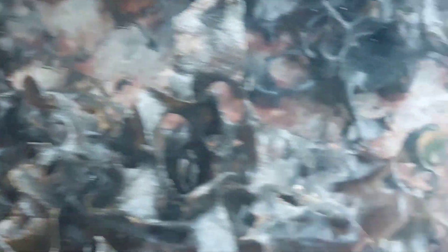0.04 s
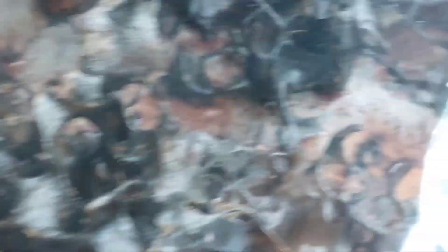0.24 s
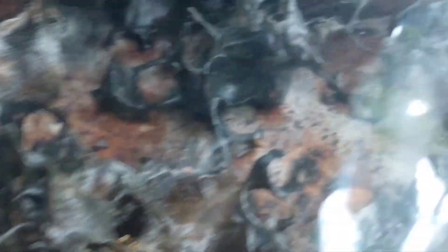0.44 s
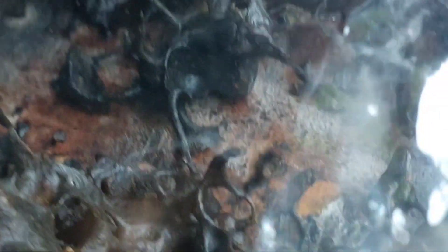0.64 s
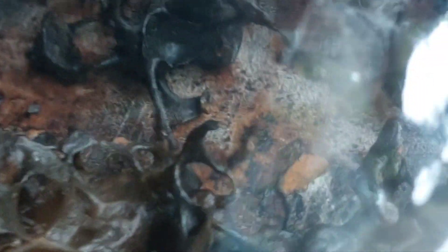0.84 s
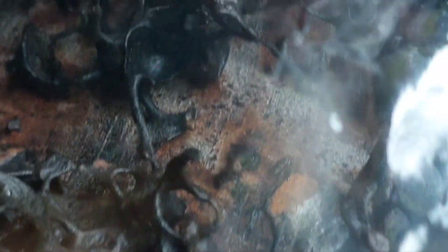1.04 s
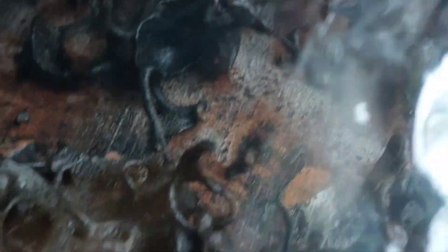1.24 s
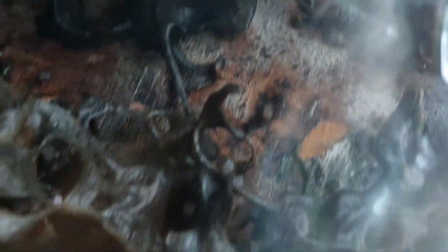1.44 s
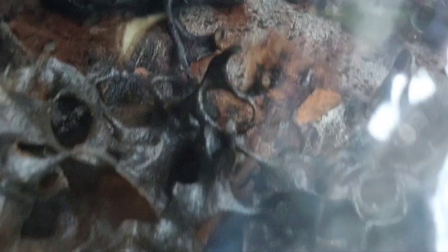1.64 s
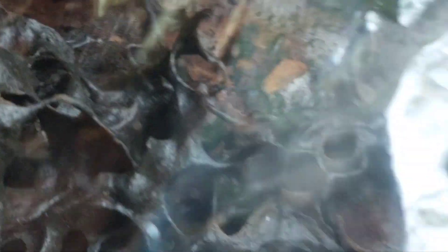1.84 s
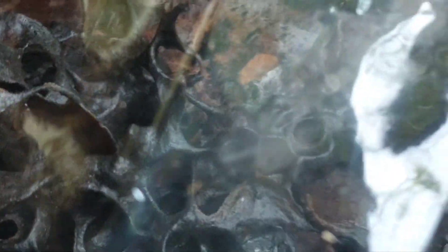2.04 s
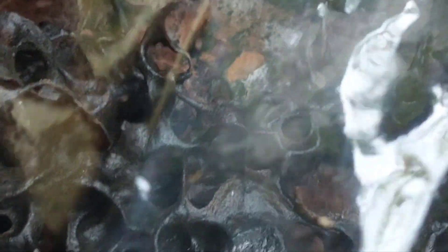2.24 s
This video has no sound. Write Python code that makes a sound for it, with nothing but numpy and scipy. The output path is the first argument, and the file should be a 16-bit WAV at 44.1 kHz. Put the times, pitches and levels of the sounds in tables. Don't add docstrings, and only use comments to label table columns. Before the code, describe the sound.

Close stereo foil crinkling outdoors, faint individual snaps at first, swelling to a short bright crackling rush at mid-length, ending in a dull knock, a few snaps and very faint high sliding squeaks over low hollow hum.

```python
import sys
import numpy as np
from scipy import signal
from scipy.fft import rfft, irfft
from scipy.io import wavfile
from scipy.ndimage import uniform_filter1d

SR = 44100
rng = np.random.default_rng(int(sys.argv[2]) if len(sys.argv) > 2 else 0)


def decibels_to_gain(level_db):
    exponent = np.asarray(level_db, float) / 20
    return 10 ** exponent


def store_wav(level_fs):
    pcm = np.round(np.clip(np.atleast_2d(level_fs), -1, 1) * 32767)
    wavfile.write(sys.argv[1], SR, pcm.T.astype(np.int16))


N = 101429

# (time [s], level [dB])
HANDLING = [(0, -74), (.46, -71), (.48, -64.5), (.6, -56), (0.718, -66), (.79, -57.5), (0.809, -59.5),
            (.92, -56), (1.04, -68.5), (1.13, -56.5), (1.21, -72), (1.222, -54), (1.33, -39.5),
            (1.478, -34), (1.66, -41), (1.685, -49), (1.779, -63), (2.3, -60)]
# (time [s], length [s], change [dB])
LULLS = [
    (1.319, 0.03, -3.5),
    (1.42, .01, -3.5),
    (1.466, 0.0061, 2),
    (1.53, 0.018, -0.5),
    (1.541, 0.012, -2),
    (0.588, 0.011, -3.5),
    (0.715, 0.023, -1),
    (0.937, 0.012, -8),
]
# (time [s], right side hears later by [samples], left over right [dB])
PLACE = [
    (0, 34, -10),
    (.7, 20.7, -1.5),
    (1.403, 19, -1),
    (1.449, 5.5, -0.5),
    (2.3, 5.4, -6.5),
]
# (frequency [Hz], level [dB per Hz])
FOIL = [(350, -7), (600, -13.5), (1100, -1), (1540, -1), (1950, -4), (3230, -3), (15800, -9.5)]
# (frequency [Hz], width [Hz], change [dB])
SHEET_HUMPS = [(1130, 400, 3), (1950, 300, 3), (2350, 450, 5), (1500, 250, -6), (4660, 500, 2),
               (8800, 1200, -4)]
# (time [s], peak [dB], brightness [dB per octave])
SNAPS = [(0.0593, -46, 2.5), (0.099, -47, -4), (0.1263, -46.5, 3), (0.134, -54, 0), (0.1793, -44, -8),
         (0.2445, -41.5, -5), (0.358, -44, 16), (0.3671, -38.5, -2.5), (0.5518, -40.5, 2),
         (0.5807, -43, -1), (0.606, -46.5, -6), (0.6534, -50, -2), (0.6782, -44, 1),
         (0.7038, -36.5, 3.5), (0.747, -35, 7.5), (0.7663, -42.5, -2), (0.803, -53, -14),
         (0.8247, -39.5, -1), (0.845, -38.5, 0.5), (0.861, -42, 7), (0.8737, -40, -1),
         (0.891, -36, -6), (0.916, -41.5, -1), (0.923, -48, 3), (0.969, -44.5, 1), (0.992, -41, 6),
         (1.059, -43, 7), (1.0791, -26.5, 4.5), (1.0946, -41, 5),
         (1.1212, -41.5, -4), (1.1346, -39, 4), (1.1472, -42, -7), (1.221, -33.5, 1.5),
              (1.266, -20, 6.5), (1.287, -23.5, 0), (1.554, -25, 8.5), (1.5737, -22, 3.5),
              (1.6012, -18.5, 7), (1.614, -45, 4), (1.67, -31, -0.5), (1.6875, -38, -1), (1.712, -33, 1),
              (1.7293, -40, 0), (1.7716, -40, 1), (1.7993, -40, 0), (1.813, -46, -3), (1.867, -42.5, 1),
              (1.877, -31, 8), (1.9148, -39.5, -2), (2.0228, -30, -2), (2.0565, -41, 0), (2.0882, -38, -5),
              (2.1568, -41.5, -2), (2.193, -38.5, -1), (2.2193, -32.5, 3), (2.2783, -29, 5),
         (1.2946, -26, 10), (1.319, -28.5, 4), (1.364, -27, 3), (1.379, -32, 6), (1.392, -26, 14),
              (1.402, -36, 5), (1.41, -38, 8), (1.59, -26, 3), (1.615, -21, -1), (1.634, -39, 12),
              (1.644, -54, -7), (1.745, -54, 2), (1.763, -48.5, -2), (1.781, -39, -11), (1.806, -43.5, 4),
              (0.641, -55, 2), (0.659, -46, 0), (0.831, -42, 0), (0.902, -45, -5), (0.952, -54, -6),
              (2.11, -53.5, 6), (2.176, -46, 4)]
# (time [s], peak [dB], brightness [dB per octave], length [s])
RUNS = [(0.474, -42, 0, 0.01), (0.496, -44.5, 2.5, 0.011), (0.525, -47.5, -1.5, 0.0082),
        (0.806, -44.5, 3, 0.015), (0.964, -46.5, 1, 0.006), (1.425, -32, 8, 0.0041),
        (1.43, -28.5, 2, 0.014), (1.456, -16.5, 2, 0.006), (1.464, -18.5, -1, 0.0023),
        (1.48, -21.5, -1.5, 0.01), (1.491, -18.5, 4, 0.0022), (1.5, -26, 1, 0.008),
        (1.531, -16.5, 4.5, 0.0015), (1.569, -26.5, 0, 0.0017), (1.601, -31, -8, 0.01)]
# (time [s], peak [dB], pitch [Hz], time to fall 60 dB [s])
POPS = [
    (0.478, -50, 2200, .025),
    (0.77, -51, 2200, .035),
    (0.892, -49, 2300, .035),
    (1.458, -27, 1100, .025),
    (1.505, -28, 1900, .055),
    (1.609, -30, 1650, .03),
    (1.7, -39, 1950, .014),
    (2.086, -45, 1600, .03),
]
# (time [s], pitch [Hz], level [dB])
SQUEAK_RISING = [(1.915, 12500, -68), (1.93, 13300, -62), (1.985, 14600, -57), (2.0, 15200, -66),
                 (2.02, 15600, -64), (2.04, 14800, -61), (2.08, 13750, -58), (2.11, 14200, -60),
                 (2.13, 14900, -63)]
SQUEAK_LONG = [(1.985, 12300, -65), (2.018, 13000, -59), (2.065, 12100, -65), (2.105, 12800, -57),
               (2.135, 13600, -61), (2.175, 13400, -60), (2.198, 12800, -60), (2.252, 13000, -60),
               (2.285, 12200, -62)]
SQUEAK_FALLING = [(2.185, 14700, -67), (2.2, 14400, -63), (2.25, 14500, -62), (2.275, 13800, -62),
                  (2.3, 13100, -64)]
SQUEAK_LOW = [(2.0, 9100, -78), (2.1, 9600, -77), (2.14, 10200, -72), (2.19, 9700, -73)]
SQUEAK_FIRST = [(1.895, 13400, -73), (1.92, 14400, -68), (1.95, 14950, -71)]
# (time [s], pitch [Hz], level [dB])
RUB = [(1.9, 2560, -68), (1.94, 2700, -65), (1.985, 2640, -62), (2.01, 2520, -67), (2.045, 2580, -62),
       (2.07, 2380, -66), (2.15, 2520, -65), (2.21, 2680, -66)]
RUB_HIGH = [(1.95, 5100, -73), (2.0, 5400, -69), (2.07, 5300, -72), (2.14, 5550, -69), (2.2, 5400, -70),
            (2.27, 5350, -73)]
RUB_HAZE = [(1.84, 2750, -64.5), (2.05, 2610, -58.5), (2.3, 2450, -69)]
# (time [s], pitch [Hz], level [dB])
SCRAPE = [
    (.14, 1770, -68),
    (.2, 1610, -62),
    (.28, 1630, -65.5),
]
# (time [s], level [dB])
WHINE = [(0, -87), (.33, -72), (0.399, -92.5), (1.2, -90)]
# (frequency [Hz], width [Hz], level [dB])
HOLLOW = [(105, 32, -9.5), (150.9, 13.6, -4.5), (255.7, 30, -5), (306.8, 23.8, -1.5), (404.4, 99, -11),
          (461, 135, -16)]
# (frequency [Hz], level [dB per Hz])
AIR = [(45, 4), (125, 3), (210, -10.5), (520, -20), (850, -24.5), (2300, -27.5), (8500, -40), (16000, -45)]
# (frequency [Hz], likeness [0 to 1])
AIR_SAME = [(60, 0.69), (240, 0.83), (950, 0.16), (3770, 0.06), (15000, 0.02)]
# (frequency [Hz], left over right [dB])
AIR_PAN = [(40, -0.5), (150, 2.5), (500, -2.5), (1200, -6.5), (8000, -4)]
# (time [s], level [dB])
GUSTS = [
    (0, -3.5),
    (.5, 4),
    (.85, -2.5),
    (1.4, 0.5),
    (1.6, -2.5),
    (1.8, -0.5),
    (2.3, -4),
]

THUMP_S = 1.608
RUB_WIDTH_HZ = 680


def evened(x):
    return x / np.sqrt(np.mean(x ** 2) + 1e-20)


def drift(x, first, second):
    return evened(uniform_filter1d(uniform_filter1d(x, size=first), size=second))


def read(points, hz):
    f, value = np.transpose(points)
    return np.interp(np.log(hz + 1), np.log(f + 1), value)


def coloured(x, db_of):
    size = x.shape[-1]
    gain = decibels_to_gain(db_of(np.fft.rfftfreq(size, 1 / SR)))
    return irfft(rfft(x) * gain, size)


def resonate(x, hz, width_hz):
    turn = np.exp(2j * np.pi * np.cumsum(hz * np.ones(len(x))) / SR)
    r = np.exp(-np.pi * width_hz / SR)
    return 2 * (turn * signal.lfilter([1 - r], [1, -r], x / turn)).real


def heard(near, other):
    share, at = 0.3, np.arange(N)
    s, lag, pan_db = np.transpose(PLACE)
    lag = np.interp(at / SR, s, lag).round().astype(int)
    pan_db = np.interp(at / SR, s, pan_db)
    far = share * near + np.sqrt(1 - share ** 2) * other
    right = far[np.maximum(at - lag, 0)]
    return np.array([near * decibels_to_gain(pan_db / 2), right * decibels_to_gain(-pan_db / 2)])


def handling_db():
    t = np.arange(N) / SR
    effort = np.interp(t, *np.transpose(HANDLING))
    for s, length, db in LULLS:
        effort += db * np.exp(-(2 * (t - s) / length) ** 4)
    return effort


def humps_db(hz):
    return sum(db * np.exp(-2 * ((hz - f) / w) ** 2) for f, w, db in SHEET_HUMPS)


def foil_db(hz):
    return read(FOIL, hz) + humps_db(hz) - 24 * np.maximum(np.log2(550 / (hz + 1)), 0)


def creases():
    light_per_s, rush_per_s = 600, 3500
    spread_db, clump_db = 3.6, 1
    rise_s, t60_s = 0.001, 0.006
    effort = handling_db()
    work = (effort - effort.min()) / (effort.max() - effort.min())
    rate = light_per_s * (rush_per_s / light_per_s) ** work
    clumps = drift(rng.standard_normal(N), 500, 300)
    size = decibels_to_gain(spread_db * np.minimum(rng.exponential(1, N), 4) + clump_db * clumps)
    size *= (rng.random(N) < rate / SR) / np.sqrt(rate)
    kinds = 24
    kind = rng.integers(0, kinds, N)
    t = np.arange(1500) / SR
    shape = np.minimum(t / rise_s, 1) ** 2 * decibels_to_gain(-60 * t / t60_s)
    out = np.zeros((2, N))
    for k in range(kinds):
        tick = rng.standard_normal((2, len(t))) * shape
        out += signal.oaconvolve((size * (kind == k))[None], tick, axes=1)[:, :N]
    near, other = evened(coloured(out, foil_db)) * decibels_to_gain(effort)
    return heard(near, other)


def snap_colour(tilt_db):
    lumps_db = 3.5 * rng.standard_normal(16)

    def colour(hz):
        bright = tilt_db * np.log2(np.clip(hz, 1800, 11500) / 5000)
        low_cut = 7 * np.maximum(np.log2(2600 / (hz + 1)), 0)
        lumps = np.interp(np.sqrt(hz / hz[-1]), np.linspace(0, 1, 16), lumps_db)
        return foil_db(hz) + bright - low_cut + lumps

    return colour


def snaps():
    rise_s, hold_s, t60_s = 0.00054, 0.0024, 0.016
    tail_db, tail_t60_s, trim_db = -20, 0.05, -9
    events = [(*row, hold_s) for row in SNAPS] + RUNS
    out, on = np.zeros((2, N + 4096)), np.arange(4096) / SR
    for s, db, tilt_db, hold in events:
        after = np.maximum(on - hold, 0)
        fall = decibels_to_gain(-60 * after / t60_s) + decibels_to_gain(tail_db - 60 * after / tail_t60_s)
        shape = np.minimum(on / rise_s, 1) ** 2 * fall
        noise = coloured(rng.standard_normal((2, len(on))), snap_colour(tilt_db))
        at = round(s * SR)
        out[:, at:at + len(on)] += evened(noise) * shape * decibels_to_gain(db + trim_db)
    return heard(*out[:, :N])


def pops():
    rise_s = 0.00067
    out, on = np.zeros((2, N + 4096)), np.arange(4096) / SR
    for s, db, hz, t60 in POPS:
        phase = 2 * np.pi * rng.random((2, 1))
        shape = np.minimum(on / rise_s, 1) * decibels_to_gain(db - 60 * on / t60)
        at = round(s * SR)
        out[:, at:at + len(on)] += shape * np.sin(2 * np.pi * hz * on + phase)
    return heard(*out[:, :N])


def sliding(track, width_hz, tone):
    t = np.arange(N) / SR
    s, hz, db = np.transpose(track)
    waver, flicker = [drift(x, 400, 250) for x in rng.standard_normal((2, N))]
    hz = uniform_filter1d(np.interp(t, s, hz), size=500) * (1 + 0.003 * waver)
    end_db = db[-1] if s[-1] >= t[-1] - .01 else -140
    level_db = np.interp(t, s, db, -140, end_db) + 1.5 * flicker
    level = uniform_filter1d(decibels_to_gain(level_db), size=300)
    clean = tone * np.sqrt(2) * np.sin(2 * np.pi * np.cumsum(hz) / SR)
    paths = []
    for x in rng.standard_normal((2, N)):
        fuzz = evened(resonate(resonate(x, hz, width_hz), hz, width_hz))
        paths.append(level * (clean + (1 - tone) * fuzz))
    return heard(*paths)


def squeaks():
    tracks = (SQUEAK_RISING, SQUEAK_LONG, SQUEAK_FALLING, SQUEAK_LOW, SQUEAK_FIRST)
    return decibels_to_gain(-0.5) * sum(sliding(track, 170, 0.45) for track in tracks)


def rubbing():
    tones = sliding(RUB, 90, 0.6) + sliding(RUB_HIGH, 90, 0.6)
    return tones + sliding(RUB_HAZE, RUB_WIDTH_HZ, 0)


def scrape():
    octave = [(s, 2 * hz, db - 3) for s, hz, db in SCRAPE]
    return sliding(SCRAPE, RUB_WIDTH_HZ, 0) + sliding(octave, 2 * RUB_WIDTH_HZ, 0)


def whine():
    return sliding([(s, 10770, db) for s, db in WHINE], 640, 0)


def box_ring(noise):
    out = 0
    for hz, width, db in HOLLOW:
        out = out + decibels_to_gain(db) * evened(resonate(resonate(noise, hz, width), hz, 1.55 * width))
    return out


def hollow():
    hum_db, sag_db = -53, -4
    shake_db, follow = -8.5, 0.88
    thump_db, rise_s, t60_s = -30, 0.006, 0.1
    t = np.arange(N) / SR
    effort = handling_db()
    peak = effort.max()
    hum = decibels_to_gain(hum_db + sag_db * np.clip(2 * (t - THUMP_S), 0, 1))
    shake = decibels_to_gain(peak + shake_db + follow * (effort - peak))
    since = np.maximum(t - THUMP_S, 0)
    thump = np.minimum(since / rise_s, 1) * decibels_to_gain(thump_db - 60 * since / t60_s)
    a, b = [box_ring(x) for x in rng.standard_normal((2, N))]
    left, right = decibels_to_gain(1.5) * a, decibels_to_gain(-2.35) * (1.005 * a + 0.55 * b)
    return (hum + shake + thump) * np.array([left, right])


def air():
    hz = np.fft.rfftfreq(2048, 1 / SR)
    frames = (N // 256 + 5) // 2 + 4
    a, b, c, d, patches = rng.standard_normal((5, len(hz), frames))
    patches = evened(uniform_filter1d(uniform_filter1d(patches, size=20, axis=0), size=6, axis=1))
    gust = np.interp(np.arange(frames) * 512 / SR, *np.transpose(GUSTS))
    gust_db = np.outer(1 / (1 + (hz / 188) ** 4), gust)
    same = np.clip(read(AIR_SAME, hz), -1, 1)[:, None]
    left = a + 1j * b
    right = same * left + np.sqrt(1 - same ** 2) * (c + 1j * d)
    colour_db = (read(AIR, hz) + 0.58 * humps_db(hz))[:, None]
    pan_db = np.multiply.outer([.5, -.5], read(AIR_PAN, hz))[..., None]
    spectra = np.array([left, right]) * decibels_to_gain(colour_db + gust_db + 2.22 * patches + pan_db)
    sound = signal.istft(spectra, nperseg=2048, noverlap=1536)[1][:, :N]
    return decibels_to_gain(-47) * evened(sound)


def scene():
    foil = creases() + snaps() + pops()
    slides = squeaks() + rubbing() + scrape() + whine()
    return foil + slides + hollow() + air()


def low_pass(x):
    return signal.sosfilt(signal.butter(12, 17140, fs=SR, output="sos"), x)


def record(dry):
    edge_hz, edge_db = 15900, -32

    def top_db(hz):
        step = edge_db * np.clip((hz - edge_hz) / 150, 0, 1)
        return step + 2 * edge_db * (hz > 1.06 * edge_hz)

    low_cut = signal.butter(8, 38, "highpass", fs=SR, output="sos")
    mix = signal.sosfilt(low_cut, coloured(dry, top_db))
    return low_pass(mix)


dry = scene()
out = record(dry)
store_wav(out)
```